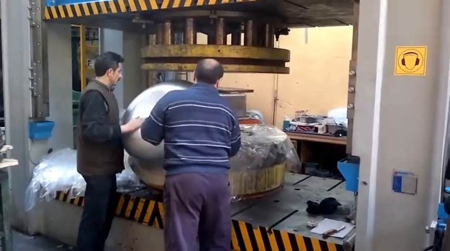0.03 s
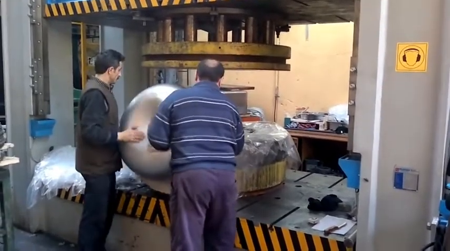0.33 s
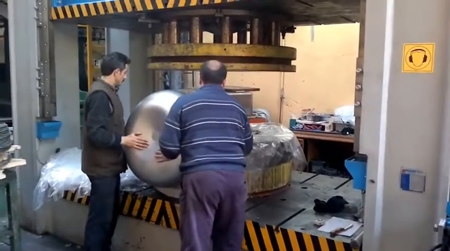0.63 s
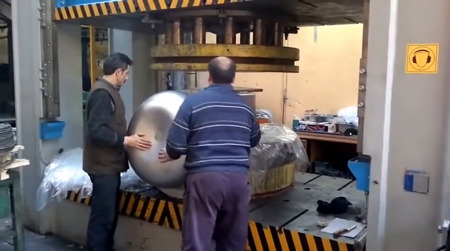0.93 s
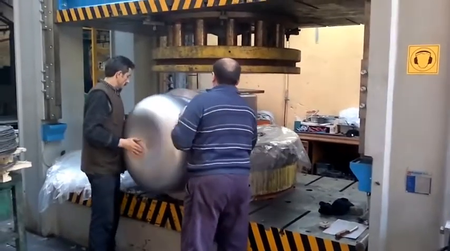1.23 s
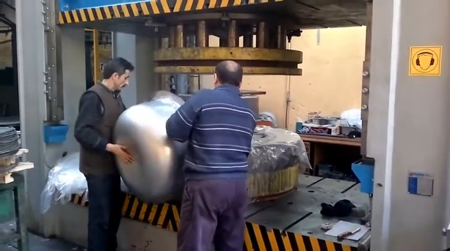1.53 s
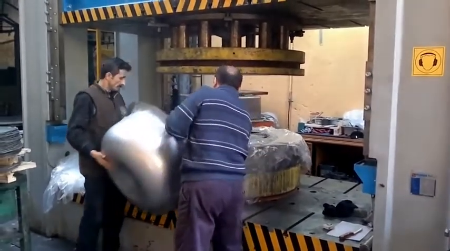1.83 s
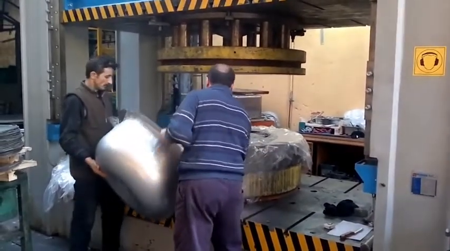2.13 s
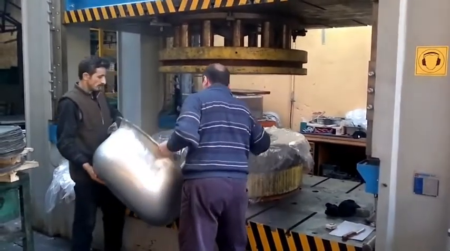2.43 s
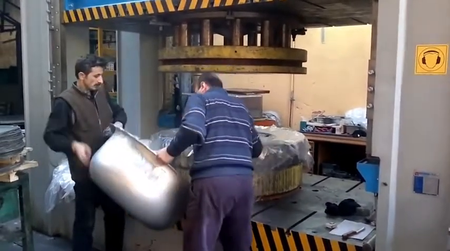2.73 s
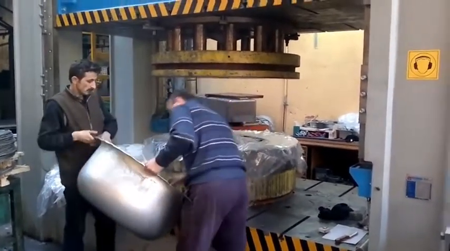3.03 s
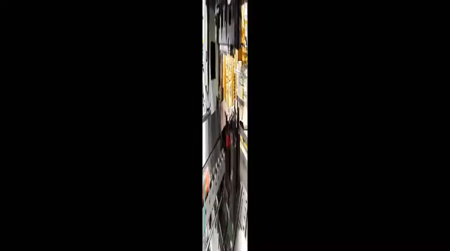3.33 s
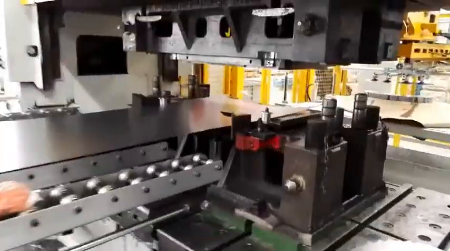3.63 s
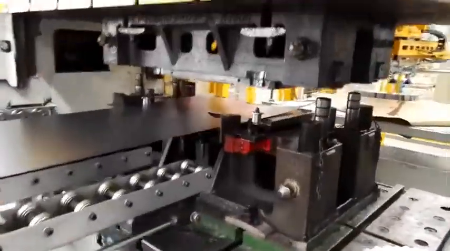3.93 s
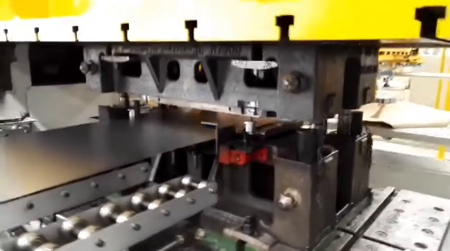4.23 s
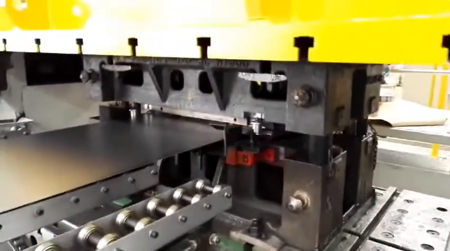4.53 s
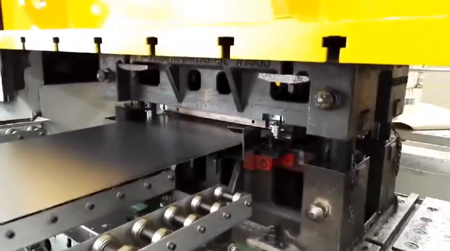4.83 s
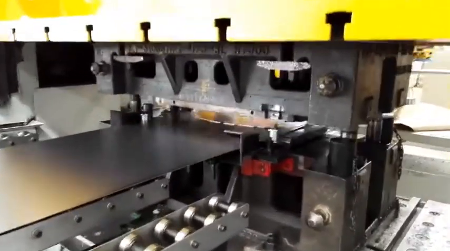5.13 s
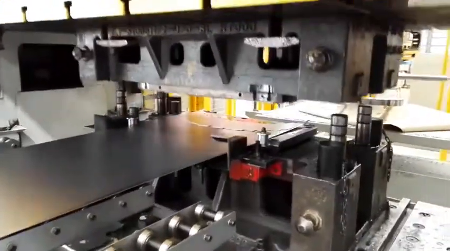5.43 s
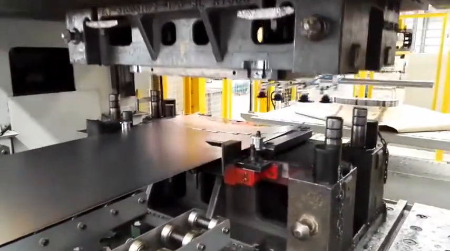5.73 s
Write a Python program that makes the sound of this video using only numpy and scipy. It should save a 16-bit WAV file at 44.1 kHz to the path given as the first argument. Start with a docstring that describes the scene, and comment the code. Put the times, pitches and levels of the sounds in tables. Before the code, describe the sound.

Hollow metal bumps and scrapes over a factory drone, followed by a stamping press's sharp clank, thud and puffs of compressed air.

```python
"""A factory: two scenes with a short silence between them.
First, in mono: a hydraulic pump drones in a hall while a deep-drawn steel tub is bumped and dragged
off its die; gain control ducks the drone.
Then, in stereo: a stamping press hums and feeds its strip; the die clanks down, punches through
with a thud and lifts amid puffs of air."""
import sys
import numpy as np
from scipy import signal
from scipy.fft import rfft, irfft, next_fast_len
from scipy.io import wavfile
from scipy.ndimage import uniform_filter1d, map_coordinates

SR = 44100
rng = np.random.default_rng(int(sys.argv[2]) if len(sys.argv) > 2 else 0)


def generate_wav(signal):
    """Clip the signal to [-1, 1] and save it as 16-bit WAV at the path in sys.argv[1]."""
    frames = np.transpose(np.atleast_2d(signal))
    scaled = np.clip(frames, -1, 1) * 32767
    pcm = np.round(scaled).astype(np.int16)
    wavfile.write(sys.argv[1], SR, pcm)


N = 254898

HALL_END_S, PRESS_START_S = 3.158, 3.426
PRESS_TOP_HZ = 14400
# die hits the strip: t/s, level/dB, rise/s, t60/s, L-R/dB
CLANKS = [(4.6165, -0.1, 0.006, 0.065, -1.5), (4.64, -10, 0.0033, 0.15, -4), (4.622, -20, 0.016, 1, 0.5)]
# frame takes the load and springs back: t/s, level/dB, rise/s, t60/s, L-R/dB
THUDS = [(4.756, -10, 0.00037, 0.018, -20), (4.7751, -13.5, 0.0032, 0.14, -2),
         (4.8, -17.5, 0.0012, 0.12, 0), (4.815, -23, 0.004, 0.94, -1.5), (4.909, -34, 0.0015, 0.16, 3),
         (4.987, -24.5, 0.0023, 0.2, -1)]
BREAKTHROUGH_S = THUDS[1][0]
# steel-on-steel contact spectrum: f/Hz, level/dB
CONTACT_COLOUR = [(250, -20), (600, 3), (1000, -1.5), (2000, -1), (3500, -6), (7000, -7), (12000, -12)]
# rough whine of a bearing or roller: f/Hz, level/dB
WHINE_COLOUR = [(900, -38), (1010, -14), (1034, 8), (1056, 10.5), (1080, -14), (1200, -33.5)]


def stroke():
    """A short puff, then the die clanks, the strip crunches and shears, the frame thuds, the floor shakes."""
    # clank spectrum: f/Hz, level/dB
    clank_colour = [(200, -31), (600, -7.5), (3000, -14.5), (4800, -16), (6500, -10.5), (8800, 3),
                    (10500, -0.5), (14000, -7)]
    # hissy puff before the stroke (two rows), then the shear's bright crash:
    # t/s, level/dB, rise/s, t60/s, L-R/dB
    puff_and_shear = [(4.213, -14.5, 0.008, 0.1, -7), (4.223, -15, 0.0037, 0.12, -5),
                      (4.737, -9, 0.005, 0.22, -7), (4.747, -3.5, 0.0077, 0.13, -6)]
    # their spectrum: f/Hz, level/dB
    bright_colour = [(1500, -21), (4200, -19), (7400, -19), (8500, -10.5), (11000, 1.5), (12000, -4.5),
                     (14200, -12.5)]
    # thud spectrum: f/Hz, level/dB
    thud_colour = [(25, -26), (65, 7), (130, -4), (230, -0.5), (390, -10.5), (520, -2), (800, -3),
                   (950, -14), (1300, -10), (2400, -17), (5000, -30), (9000, -20.5)]
    # floor spectrum: f/Hz, level/dB
    floor_colour = [(25, -29), (50, -9.5), (78, -1), (120, -8), (155, -15), (200, -5), (300, -11),
                    (500, -25), (1500, -70)]
    clank = noise_bursts(CLANKS, clank_colour, chatter_db=1.5) + die_ring(level_db=-19.5)
    crunch = amp(-26 + 1.7 * wobble(130)) * wide(CONTACT_COLOUR, pan_db=-3)
    squeeze = envelope(4.655, attack_s=0.078, hold_s=0, t60_s=2.15) * crunch
    bright = noise_bursts(puff_and_shear, bright_colour, chatter_db=0.5)
    thud = noise_bursts(THUDS, thud_colour, chatter_db=1.5)
    shudder = amp(-30) * envelope(4.765, attack_s=0.0087, hold_s=0, t60_s=2.6) * wide(floor_colour)
    return clank + squeeze + bright + thud + shudder


def noise_bursts(events, colour, chatter_db):
    """Dense, decaying noise, broken up by chatter."""
    out, t = np.zeros((2, N)), np.arange(SR) / SR
    for start_s, db, rise_s, t60_s, pan_db in events:
        chatter = amp(chatter_db * wobble(250)[:SR])
        level = amp(db) * swell(t, rise_s) * fade(t, t60_s)
        add(out, start_s, level * chatter * wide(colour, pan_db, size=SR))
    return out


def die_ring(level_db, per_mode=3, spread=0.016):
    """The die rings after each clank in beating clusters of close partials, differently at each ear."""
    # die modes: f/Hz, level/dB, t60/s
    modes = [(2380, -15, 0.25), (3400, -18, 0.13), (3950, -12, 0.4), (5120, -16, 0.43), (6400, -10, 0.27),
             (7100, -4.5, .15), (8020, 2.5, 0.14), (9060, 1.5, 0.13), (8900, -4, .2), (10140, -3, .2),
             (11000, -3, 0.24), (12440, -7, 0.17)]
    out, t = np.zeros((2, N)), np.arange(SR // 2) / SR
    for start_s, db, rise_s, _, _ in CLANKS:
        clusters = [(hz * (1 + spread * rng.standard_normal()), mode_db, t60_s)
                    for hz, mode_db, t60_s in modes for _ in range(per_mode)]
        add(out, start_s, amp(db + level_db) * swell(t, rise_s) * stereo_ring(clusters, t, scatter_db=2.5))
    return out


def rattles(mode_count=12, spread_oct=0.55, bounce_s=0.009, bounce_db=-6.5):
    """The punch cracks through, loose parts strike; each bounces once, with a tick and a short clatter."""
    # contacts: t/s, level/dB, f/Hz, t60/s
    contacts = [(4.756, -17.5, 1200, .025), (4.776, -15, 800, .06), (4.801, -19, 700, .08),
                (4.834, -27, 2600, .08), (4.9105, -23.5, 2200, .12), (4.96, -27, 1100, .08),
                (4.988, -21.5, 650, .12), (5.031, -29, 1200, .05)]
    out, t = np.zeros((2, N)), np.arange(SR // 5) / SR
    for start_s, db, centre_hz, t60_s in contacts:
        modes_hz = np.minimum(centre_hz * 2 ** (spread_oct * rng.standard_normal(mode_count)), PRESS_TOP_HZ)
        modes = [(hz, 0, t60_s) for hz in modes_hz]
        for delay_s, loss_db in ((0, 0), (bounce_s, bounce_db)):
            tick = amp(-7.5) * fade(t, 0.0091) * wide(CONTACT_COLOUR, size=len(t))
            clatter = ring(modes, t, scatter_db=0.5) / np.sqrt(mode_count)
            add(out, start_s + delay_s, amp(db + loss_db - 2.5) * (tick + clatter))
    return out


def crackle(snaps=34, mode_count=5):
    """The strip yields in small metallic snaps, harder and harder until the punch is through."""
    start_s, end_s = 4.635, 4.8
    end_db, growth_db_per_s, scatter_db = -34, 25, 2
    centre_hz, spread_oct, t60_s = 5000, 0.35, 0.025
    out, t = np.zeros((2, N)), np.arange(SR // 20) / SR
    for k in range(snaps):
        snap_s = start_s + (end_s - start_s) * (k + rng.random()) / snaps
        db = end_db + growth_db_per_s * (snap_s - end_s) + scatter_db * rng.standard_normal()
        modes_hz = centre_hz * 2 ** (spread_oct * rng.standard_normal(mode_count))
        add(out, snap_s, stereo_ring([(hz, db, t60_s) for hz in modes_hz], t, scatter_db=2.5))
    return out


def frame_ring():
    """The frame booms as the punch breaks through."""
    # frame modes: f/Hz, level/dB, t60/s before the overall fade
    modes = [(98.2, -7, 1.1), (141, -9, 0.91), (246, -1, 0.26), (287, -8, 1.7), (404, -13, 0.32),
             (443, -7.5, 0.42)]
    out, t = np.zeros(N), np.arange(SR) / SR
    add(out, BREAKTHROUGH_S, amp(-27.5) * swell(t, 0.0065) * fade(t, 1.2) * ring(modes, t, scatter_db=7))
    return out


def shimmer(count=45, low_hz=3000, high_hz=9500, tone_db=-41, t60_s=0.35):
    """A faint, dense shimmer of random high tones after the clank and the thud."""
    out, t = np.zeros((2, N)), np.arange(SR // 2) / SR
    pitches_hz = low_hz * (high_hz / low_hz) ** rng.random(count)
    partials = [(hz, tone_db, t60_s) for hz in pitches_hz]
    for start_s in (CLANKS[0][0], BREAKTHROUGH_S):
        add(out, start_s, swell(t, 0.003) * stereo_ring(partials, t, scatter_db=0))
    return out


def tub_bumps():
    """The tub hits the press bed and rings."""
    # bumps: t/s, level/dB, rise/s, tilt/(dB/oct), favoured mode/Hz
    blows = [(.4965, -7, 0.0012, -2.6, 495), (.529, -7.5, 0.003, .6, 545), (.6, -7.8, 0.006, .3, 495),
             (1.15, -22, 0.0064, .8, 704)]
    # shell spectrum: f/Hz, level/dB
    colour = [(30, -22.5), (70, -18), (105, -1), (160, -1), (230, -8.5), (310, -1), (420, -7), (500, 1),
              (600, -1), (690, 1), (790, -9), (1000, -15), (1420, -8.5), (2020, -10), (3500, -26),
              (5000, -28), (8500, -37.5), (15000, -53.5)]
    return tub(blows, colour, modes_db=-11, pivot_hz=450, t60_scale=1.44)


def rim_knocks():
    """The rim knocks on the die; hands damp the lifted tub."""
    # knocks: t/s, level/dB, rise/s, tilt/(dB/oct), favoured mode/Hz
    blows = [(1.606, -20.5, 0.001, 0, 1534), (1.661, -12.8, 0.0008, -.8, 831),
             (1.697, -11.8, 0.004, -.2, 831), (1.75, -11, 0.005, 1, 156), (1.788, -13.5, 0.005, 5.5, 1863)]
    # shell spectrum: f/Hz, level/dB
    colour = [(40, -25.5), (122, -20.5), (156, 6.5), (240, -8.5), (290, 2), (450, -6), (660, 5.5),
              (830, -3.5), (1030, -11), (1450, -2), (2000, -2), (3400, -19.5), (5000, -21), (8000, -39),
              (15000, -55)]
    return tub(blows, colour, modes_db=-3.5, pivot_hz=705, t60_scale=0.72)


def tub(blows, colour, modes_db, pivot_hz, t60_scale, favour_db=6.5):
    """Each blow rings the tub's clear modes and a dense wash of shell modes that hangs in the hall."""
    # tub modes: f/Hz, level/dB, unscaled t60/s
    modes = [(156, -4, .8), (288, -9, .9), (371, -3.5, 1.1), (495, -6.5, 1.2), (545, -7, 1.1),
             (628, -10, 1.1), (647, -5.5, 1.3), (676, -8.5, 1.7), (704, -10, 1.4), (831, -5, .65),
             (1372, -9.5, 1.6), (1437, -14, 1.6), (1534, -13, 1.4), (1863, -15, .9), (1991, -10.5, 1.4),
             (2025, -12, 1.3), (2299, -18, 1.1)]
    # hall decay: f/Hz, t60/s
    hall_decay = [(80, 1.3), (600, 1.24), (2000, 1.37), (5000, 0.56), (12000, 0.3)]
    out, t = np.zeros(N), np.arange(SR) / SR
    for start_s, db, rise_s, tilt_db, favoured_hz in blows:
        shell = coloured(rng.standard_normal(SR), tilted(colour, tilt_db, pivot_hz))
        bins_hz, frames_s, spectra = signal.stft(shell, SR, nperseg=256)
        decay = fade(frames_s, along(hall_decay, bins_hz)[:, None])
        wash = signal.istft(spectra * decay, SR, nperseg=256)[1][:SR]
        struck = []
        for hz, mode_db, t60_s in modes:
            # harder contact is brighter; the point of contact favours one mode
            contact_db = tilt_db * np.log2(hz / pivot_hz) + favour_db * (hz == favoured_hz)
            struck.append((hz, mode_db + contact_db, t60_scale * t60_s))
        clear = amp(modes_db) * ring(struck, t, scatter_db=1.5)
        add(out, start_s, amp(db) * swell(t, rise_s) * (wash + clear))
    return out


def bed_boom(level_db):
    """The heavy tub rocks down in three thumps, each booming in the press bed."""
    # bed modes: f/Hz, level/dB, t60/s
    modes = [(101.8, -10, 0.14), (143, -3, 0.074), (177, -9.5, 0.088)]
    # thumps: t/s, level/dB
    thumps = [(.497, -5.5), (.524, -4), (.552, -1.5)]
    out, t = np.zeros(N), np.arange(SR) / SR
    boom = sum(amp(db) * fade(t, t60_s) * np.sin(2 * np.pi * hz * t) for hz, db, t60_s in modes)
    for start_s, db in thumps:
        add(out, start_s, amp(db + level_db) * swell(t, 0.0026) * boom)
    return out


def scrapes():
    """The tub's rim scuffs and drags over the die in tiny uneven slips."""
    # drags: t/s, level/dB, attack/s, hold/s, t60/s, tilt/(dB/oct)
    drags = [(.4965, -30.5, .001, 0.024, 0.25, 0.5), (.526, -29, .004, 0, .55, -4),
             (1.38, -40.5, .1, .13, .6, -1), (1.68, -23, .06, 0.077, 0.57, -2.5),
             (1.733, -21.5, .02, 0.016, 0.24, 6), (1.9, -41, .06, .1, 1, -8.5)]
    # friction spectrum: f/Hz, level/dB
    colour = [(1500, -32), (3500, -3.5), (5200, 5.5), (6600, -1), (8200, -1), (11000, -13.5), (15000, -25)]
    out = np.zeros(N)
    for start_s, db, attack_s, hold_s, t60_s, tilt_db in drags:
        slips = rng.standard_normal(N) * amp(1.2 * wobble(300))
        friction = coloured(slips, tilted(colour, tilt_db, pivot_hz=5200))
        out += amp(db) * envelope(start_s, attack_s, hold_s, t60_s) * friction
    return out


def ticks():
    """Small, sharp, dry ticks."""
    # ticks: t/s, level/dB, tilt/(dB/oct)
    events = [(2.7302, -12.5, 4.5), (2.7433, -16.5, -1), (3.0524, -10, -1.5)]
    # tick spectrum: f/Hz, level/dB
    colour = [(800, -11), (2600, 6), (4200, -0.5), (7000, -3.5), (15000, -16)]
    out, t = np.zeros(N), np.arange(SR // 10) / SR
    for start_s, db, tilt_db in events:
        burst = coloured(rng.standard_normal(len(t)), tilted(colour, tilt_db, pivot_hz=5000))
        add(out, start_s, amp(db) * fade(t, 0.0045) * burst)
    return out


def air():
    """Compressed air: a broad leak and a fluttering jet sink after peak load and puff as the die lifts."""
    # puffs: t/s, level/dB, attack/s, t60/s
    bursts = [(4.675, -20.5, 0.036, 0.67), (4.91, -22.5, 0.031, 0.7), (5.015, -26, 0.018, 0.55),
              (5.214, -26, 0.02, 1.5), (5.33, -22, 0.06, 1.05)]
    # leak spectrum: f/Hz, level/dB
    leak_colour = [(2000, -7.5), (6500, -6.5), (9300, 4), (12000, 3), (13500, 6), (15000, 2)]
    # jet spectrum: f/Hz, level/dB
    jet_colour = [(2500, -23.5), (4000, -16), (7500, -15.5), (9000, -4.5), (10600, 3.5), (12000, -1.5),
                  (14500, -11)]
    _, ease_db = effort_db()
    puffs = np.linalg.norm([amp(db) * envelope(start_s, attack_s, 0, t60_s)
                            for start_s, db, attack_s, t60_s in bursts], axis=0)
    leak = np.hypot(amp(-32 + ease_db), amp(-6.5) * puffs) * wide(leak_colour, pan_db=3)
    flutter = amp(1.2 * wobble(60))
    jet = np.hypot(amp(-35 + ease_db), puffs) * flutter * wide(jet_colour, pan_db=-12)
    return leak + jet


def feed():
    """The strip rasps over whining rollers, before the stroke and once the die is clear."""
    # advances: t/s, hold/s, level/dB
    advances = [(3.42, .32, -33), (5.27, .05, -36.5)]
    # rasp spectrum: f/Hz, level/dB
    colour = [(600, -4), (950, -8), (1500, -3), (2250, 2), (3200, -7), (4100, 5), (6200, -5), (7300, -2),
              (9000, 3.5), (10200, 5), (12000, -5), (15000, -16)]
    motion = sum(amp(db) * envelope(start_s, 0.14, hold_s, t60_s=0.69) for start_s, hold_s, db in advances)
    rasp = amp(1.6 * wobble(25.3)) * wide(colour, pan_db=-1.5)
    rollers = amp(-12.5) * wide(WHINE_COLOUR)
    return motion * (rasp + rollers)


def pump(piston_hz=174.8, twin_hz=172.4, valve_hz=899.3):
    """Piston tones and a valve's whistle over pulsing oil; a second pump beats against the first."""
    # piston tones: harmonic number, level/dB
    harmonics = [(1, -31), (2, -36.5), (3, -41.5), (4, -34.5), (5, -35), (6, -42.5), (7, -42), (9, -45.5),
                 (10, -38), (11, -43.5), (12, -41), (13, -43), (14, -54)]
    # motor and mains tones: f/Hz, level/dB
    motor_lines = [(100, -44), (323, -39.5), (1099.5, -42)]
    # oil passes the valve: t/s, hold/s, level/dB
    openings = [(-.4, .52, -29.5), (.3, 2.6, -41), (2.65, .3, -32)]
    # rush of oil and fans: f/Hz, level/dB
    rush_colour = [(25, -10.5), (60, -1.5), (105, -11.5), (170, 3.5), (250, -0.5), (330, -3.5), (450, -3.5),
                   (700, -3), (1000, -4.5), (2150, -9.5), (3600, -22.5), (5400, -22), (9000, -29.5),
                   (15000, -41)]
    pistons = tones([(k * piston_hz, db) for k, db in harmonics], waver_db=1.5, drift_rad=0.55, rate_hz=6)
    twin = tones([(twin_hz, -37)], waver_db=2, drift_rad=0.8, rate_hz=4)
    motor = tones(motor_lines, waver_db=1, drift_rad=0.32, rate_hz=4.87)
    flow = sum(amp(db) * envelope(start_s, 0.52, hold_s, t60_s=2) for start_s, hold_s, db in openings)
    whistle = flow * tones([(valve_hz, 0)], waver_db=1, drift_rad=0.4, rate_hz=7)
    pulsing = 1 + 0.079 * np.cos(2 * np.pi * piston_hz * clock())
    rush = coloured(rng.standard_normal(N) * pulsing, rush_colour) * amp(-25 + 0.95 * wobble(7.99))
    return pistons + twin + motor + whistle + rush


def drive():
    """Flywheel drone, gear tones, bearing whirr and one bearing's rough whine follow the press's effort."""
    # flywheel spectrum: f/Hz, level/dB
    drone_colour = [(15, -49), (25, -33), (55, -15), (100, -11), (125, -17), (145, -7), (178, -10.5),
                    (220, -3.5), (310, -7), (600, -13), (882, -20.5), (1050, -18), (1500, -28), (1950, -56),
                    (3300, -120)]
    # bearing spectrum: f/Hz, level/dB
    whirr_colour = [(500, 0.5), (1000, -15), (1500, 1.5), (3000, -6), (4400, -1.5), (6500, -14),
                    (9000, -14)]
    # gear tones: f/Hz, level/dB
    gear_lines = [(148, -42), (222, -52), (296, -43.5), (443, -48.5), (591, -54), (1160, -56)]
    drone = amp(-34 + wobble(14)) * wide(drone_colour)
    whirr = amp(-41) * wide(whirr_colour, pan_db=-2)
    whine = amp(-50 + 2 * wobble(12)) * wide(WHINE_COLOUR)
    gears = tones(gear_lines, waver_db=1, drift_rad=0.95, rate_hz=12)
    load_db = sum(effort_db())
    return amp(load_db) * (drone + whirr + whine) + amp(load_db / 2) * gears


def effort_db(peak_s=4.56, build_db_per_s=3, ease_db_per_s=7):
    """Two slopes: the load builds on the way down and eases after its peak."""
    t = clock() - peak_s
    return build_db_per_s * np.minimum(t, 0), -ease_db_per_s * np.maximum(t, 0)


def gain_control(x, limit_db=-12, recovery_db_per_s=5, attack_s=0.016):
    """Loud sound pulls the gain down fast; it creeps back."""
    level_db = 10 * np.log10(np.abs(uniform_filter1d(x ** 2, size=1400)) + 1e-12)
    excess_db = np.maximum(level_db - limit_db, 0)
    creep_db = recovery_db_per_s * clock()
    cut_db = np.maximum.accumulate(excess_db + creep_db) - creep_db
    pole = np.exp(-1 / (attack_s * SR))
    return x * amp(-signal.lfilter([1 - pole], [1, -pole], cut_db))


def tones(lines, waver_db, drift_rad, rate_hz):
    """Machine tones whose level and phase wander."""
    t, out = clock(), np.zeros(N)
    for hz, db in lines:
        peak = np.sqrt(2) * amp(db + waver_db * wobble(rate_hz))
        out += peak * np.sin(2 * np.pi * hz * t + drift_rad * wobble(rate_hz) + 2 * np.pi * rng.random())
    return out


def ring(modes, t, scatter_db):
    """Decaying modes, struck with scattered strengths and random phases."""
    out = np.zeros(len(t))
    for hz, db, t60_s in modes:
        strength = amp(db + scatter_db * rng.standard_normal())
        out += strength * fade(t, t60_s) * np.sin(2 * np.pi * (hz * t + rng.random()))
    return out


def stereo_ring(modes, t, scatter_db):
    """The same modes, drawn anew for each ear."""
    return np.array([ring(modes, t, scatter_db) for ear in "LR"])


def wide(colour, pan_db=0, size=N):
    """Stereo noise of rms 1, alike in the bass and unrelated in the treble."""
    # left-right likeness: f/Hz, correlation
    likeness = [(130, 0.99), (290, 0.92), (630, 0.69), (1390, 0.016), (3000, 0)]

    def mid_side_gains(hz):
        angle = np.arccos(np.clip(along(likeness, hz), -1, 1)) / 2
        return amp(along(colour, hz)) * [np.cos(angle), np.sin(angle)]

    mid, side = filtered(rng.standard_normal((2, size)), mid_side_gains)
    return unit(np.array([mid + side, mid - side]) * amp([[pan_db / 2], [-pan_db / 2]]))


def coloured(x, colour):
    """x shaped by a spectrum, at rms 1."""
    return unit(filtered(x, lambda hz: amp(along(colour, hz))))


def tilted(colour, tilt_db, pivot_hz):
    """A spectrum brightened by tilt_db per octave."""
    return [(hz, db + tilt_db * np.log2(hz / pivot_hz)) for hz, db in colour]


def filtered(x, response):
    """x through a frequency response."""
    size = next_fast_len(x.shape[-1] + 8192)
    return irfft(rfft(x, size) * response(np.fft.rfftfreq(size, 1 / SR)), size)[..., :x.shape[-1]]


def along(points, hz):
    """Interpolate (f/Hz, value) points on a log axis."""
    points_hz, values = np.transpose(points)
    return np.interp(np.log(hz + 1), np.log(points_hz + 1), values)


def envelope(start_s, attack_s, hold_s, t60_s):
    """Linear attack, hold, exponential release."""
    t = clock() - start_s
    return np.clip(t / attack_s, 0, 1) * fade(np.maximum(t - attack_s - hold_s, 0), t60_s)


def swell(t, rise_s):
    """Attack from 0 to 1."""
    return 1 - np.exp(-t / rise_s)


def fade(t, t60_s):
    """Exponential decay."""
    return np.exp(-np.log(1000) * t / t60_s)


def wobble(rate_hz):
    """Smooth random curve, rate_hz knots a second."""
    return map_coordinates(rng.standard_normal(int(N * rate_hz / SR) + 4), [clock() * rate_hz])


def add(track, start_s, sound):
    """Mix a sound in at start_s."""
    part = track[..., round(start_s * SR):][..., :sound.shape[-1]]
    part += sound[..., :part.shape[-1]]


def amp(db):
    """Decibels to gain."""
    return 10 ** (np.asarray(db) / 20)


def unit(x):
    """Scale to rms 1."""
    return x / np.sqrt(np.mean(x ** 2) + 1e-20)


def clock():
    """Sample times in seconds."""
    return np.arange(N) / SR


def scene():
    """The hall with the tub, then the stamping press."""
    handling = tub_bumps() + bed_boom(level_db=-1.5) + rim_knocks()
    hall = amp(0.5) * gain_control(handling + pump() + scrapes() + ticks())
    blow = stroke() + rattles() + crackle() + frame_ring() + shimmer()
    press = filtered(blow + drive() + feed() + air(), lambda hz: hz < PRESS_TOP_HZ)
    return hall * (clock() < HALL_END_S) + press * (clock() > PRESS_START_S)


def record(dry):
    """Full-scale clipping, then a band limit."""
    return filtered(np.clip(dry, -1, 1), lambda hz: hz < 15600)


dry = scene()
out = record(dry)
generate_wav(out)
```